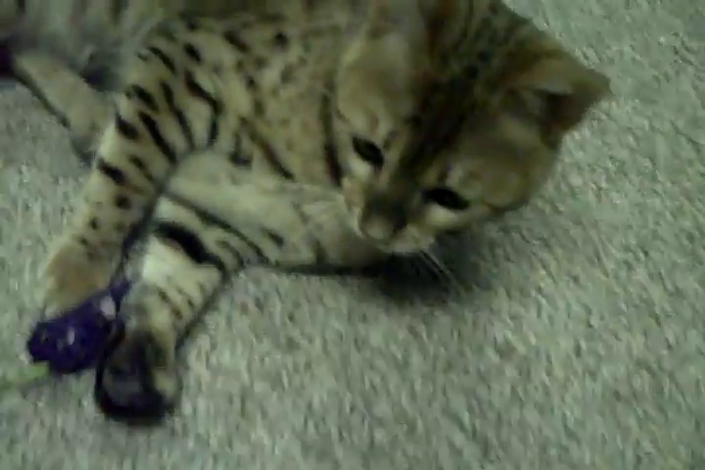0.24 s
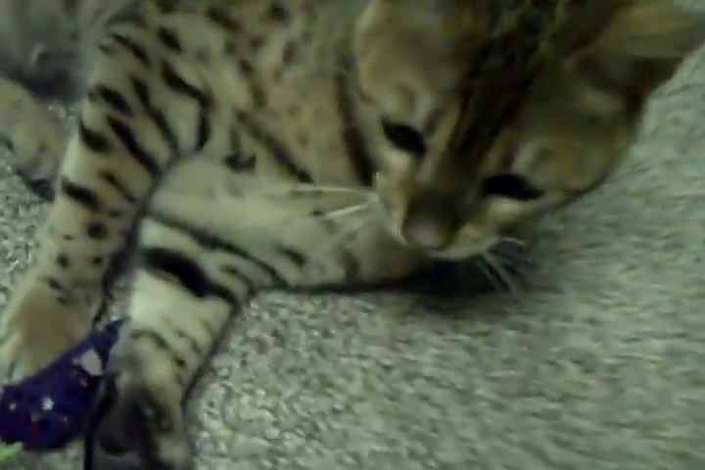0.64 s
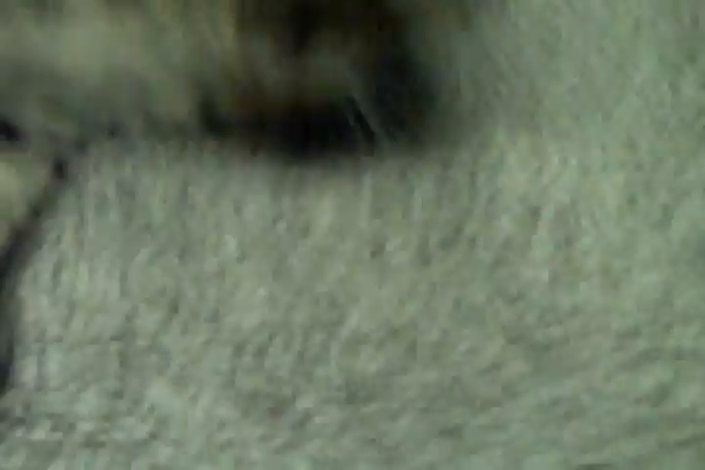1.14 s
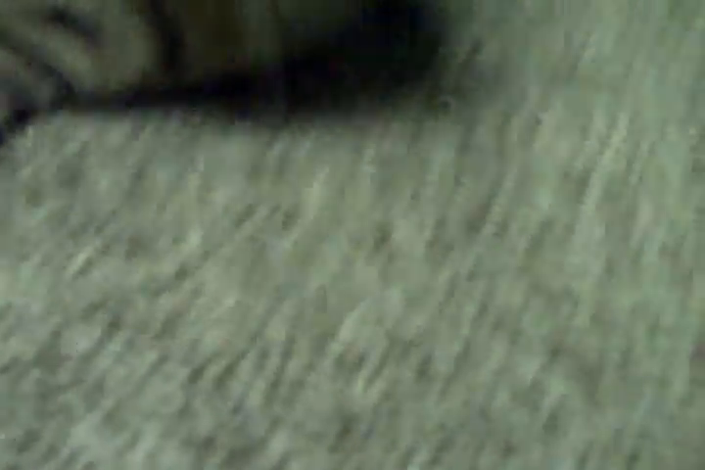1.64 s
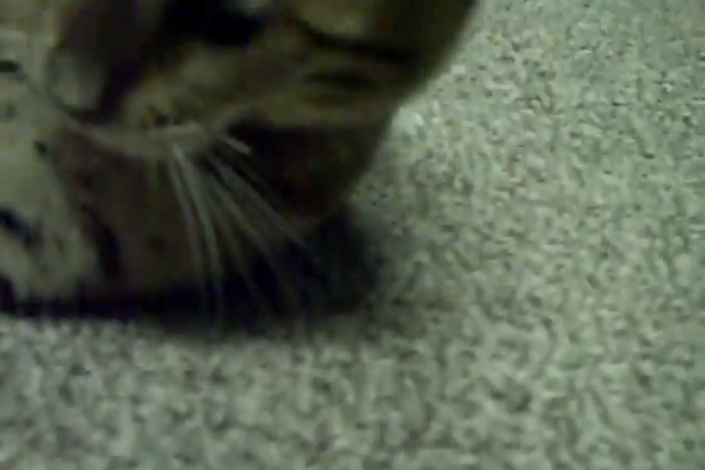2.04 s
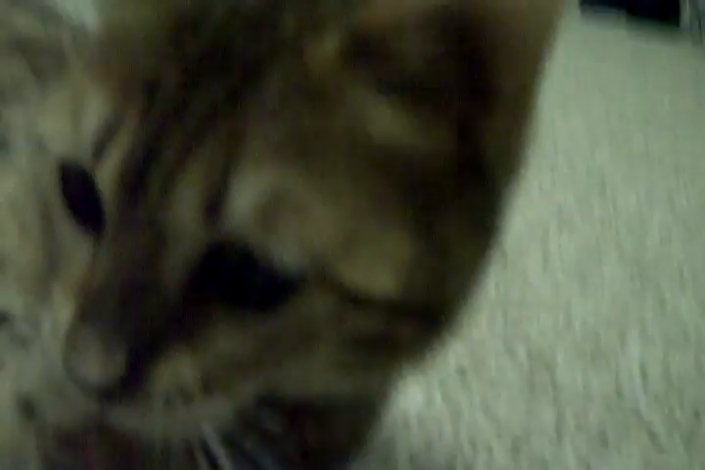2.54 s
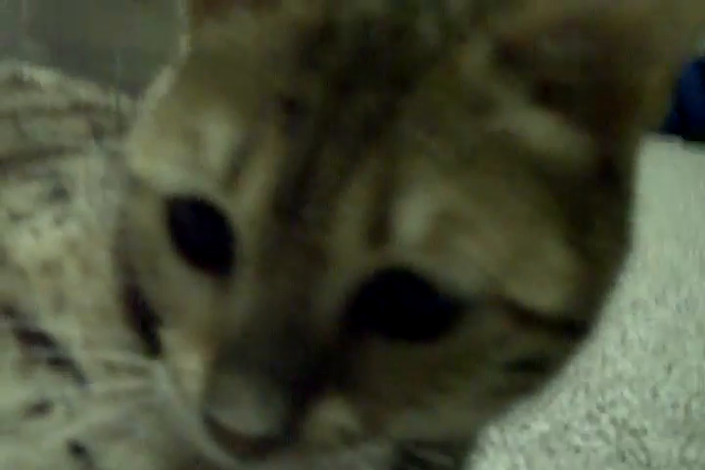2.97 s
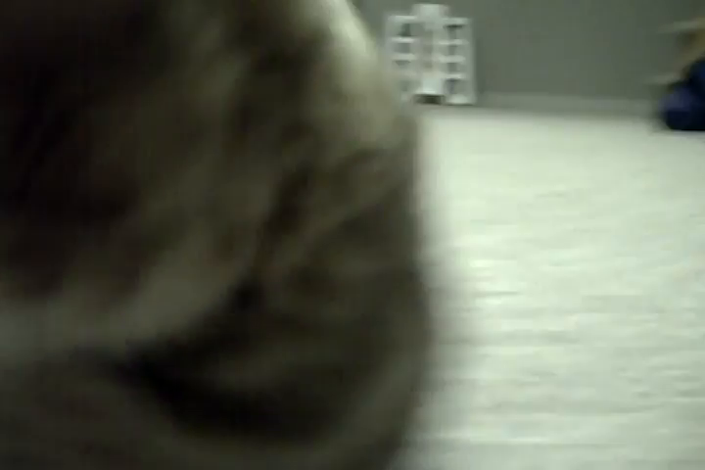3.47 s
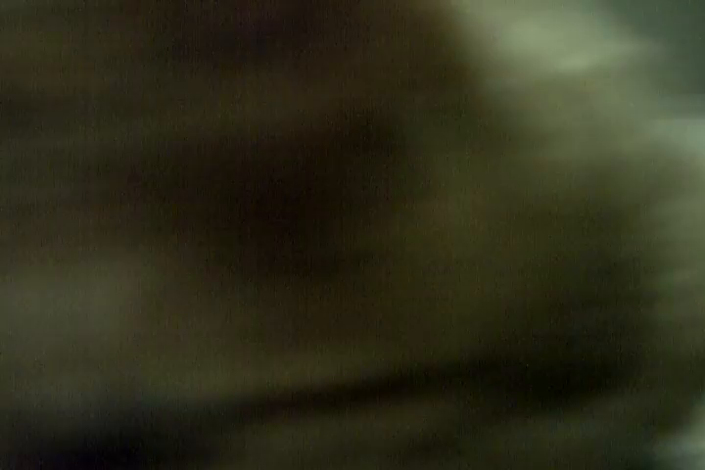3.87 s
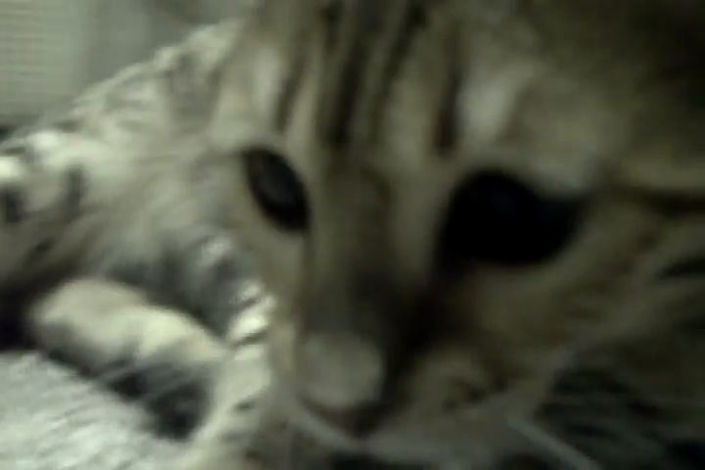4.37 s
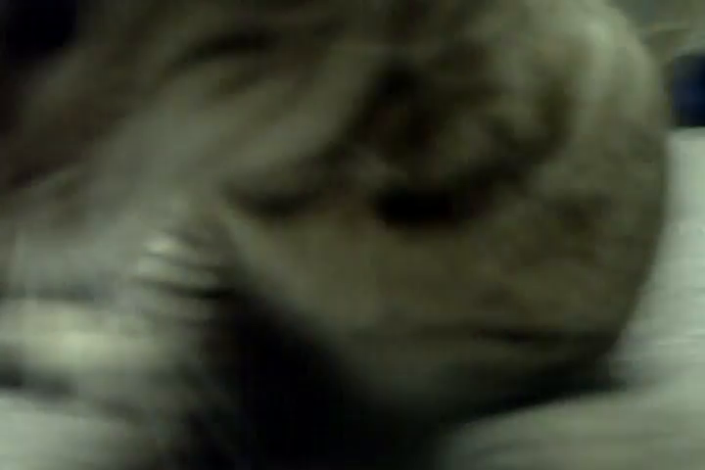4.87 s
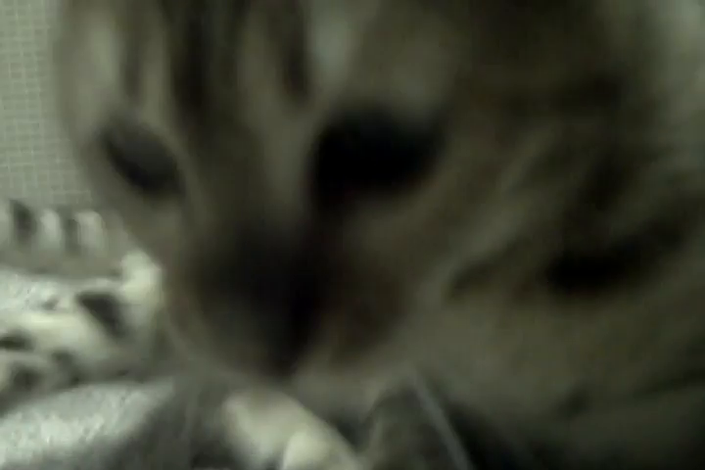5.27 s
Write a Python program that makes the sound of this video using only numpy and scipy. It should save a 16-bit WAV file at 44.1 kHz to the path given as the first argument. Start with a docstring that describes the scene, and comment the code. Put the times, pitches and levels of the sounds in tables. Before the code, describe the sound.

Close plastic clicks, paw knocks and brushing fur as a cat nudges the microphone in a quiet room with a low hum.

```python
"""On a carpet in a quiet room, a cat pushes its head and paws against a small hand-held camera.
Right at the microphone, a loose plastic part drags, snaps and bounces, claws and pads knock on
the hollow case and fur brushes over it, with a few low thumps and pops. The hardest snaps clip.
Behind this lie the soft slide of the coat, room noise, a low hum and a thin electronic whine."""
import sys
import numpy as np
from scipy import signal
from scipy.fft import rfft, irfft, next_fast_len
from scipy.io import wavfile
from scipy.ndimage import uniform_filter1d

SR = 44100
rng = np.random.default_rng(int(sys.argv[2]) if len(sys.argv) > 2 else 0)


def bounce(signal):
    """Save signal as a 16-bit WAV file at the path given by the first command-line argument."""
    frames = np.transpose(np.atleast_2d(signal))
    limited = np.clip(frames, -1, 1)
    pcm = np.round(limited * 32767).astype(np.int16)
    wavfile.write(sys.argv[1], SR, pcm)


N = 242731
TIME = np.arange(N) / SR
HIT_TIME = TIME[:SR // 5]


# Each row: snap time in seconds, level in dB, bounce delay in seconds, drag length in seconds,
# drag level in dB. A delay or length of 0 means no bounce or no drag.
PART_SNAPS = [(1.0294, -9, .0031, .006, -36), (1.0921, -4, .0061, .014, -38),
              (1.2135, -2.5, .0048, .044, -39), (1.2466, -4.3, .0057, .010, -34), (1.4182, -27.5, 0, 0, 0),
              (1.4430, -35, 0, 0, 0), (2.3365, -10.5, .0036, .022, -44), (2.3649, -3.5, 0, .008, -34)]

def snaps(bounce_db=-8.7, grip_share=.55, release_s=.014):
    """Pushed by the cat, the loose part scrapes along, snaps against its stop and bounces once."""
    out, scrape = np.zeros(N), friction()
    for s, db, bounce_s, drag_s, drag_db in PART_SNAPS:
        add(out, s, undb(db) * part_hit())
        if bounce_s > 0:
            add(out, s + bounce_s, undb(db + bounce_db) * part_hit())
        if drag_s > 0:
            gripped_s = s - drag_s * (1 - grip_share)
            grip = np.interp(TIME, [s - drag_s, gripped_s, s, s + release_s], [.15, 1, 1, 0], left=0)
            out += undb(drag_db) * scrape * grip
    return out


# Modes of the loose part. Each row: frequency in Hz, level in dB, t60 in seconds.
LOOSE_PART_MODES = [(750, -22, .014), (1350, -19, .010), (2000, -12, .016), (2280, -12, .016),
                    (2980, -6, .014), (3350, -7, .011), (3950, -5, .013), (4150, -10, .011),
                    (5420, -7, .009), (5950, -7, .009), (6750, -3, .010), (7350, 0, .010), (7750, -5, .009),
                    (8500, -8, .007), (10300, -11, .005), (3413, -42, .13), (4113, -52, .14),
                    (7154, -50, .1)]

def part_hit(burst_s=.0007):
    """The loose part hits its stop, sheds most of its energy at once and rings briefly."""
    envelope = .62 + .99 * np.exp(-HIT_TIME / burst_s)
    body = ring(LOOSE_PART_MODES, rise_s=.00022, detune=.0021) * envelope
    return body + undb(-16) * tick(decay_s=.0019, tail_db=-31, tail_s=.006)


# Each row: landing time in seconds, then levels in dB of pad thud, hollow ring,
# claw at first touch and claw on landing.
PAW_KNOCKS = [(1.2183, -25, -28, -28.5, -42), (1.3330, -25.5, -25.5, -47, -39),
              (2.0055, -24, -37, -54, -44), (2.1128, -15, -29, -29, -45), (2.3280, -33, -34, -52, -50),
              (2.3410, -33, -33, -52, -44), (5.0520, -19, -21.5, -10, -5)]

def knocks(claw_lead_s=.0044, touch_db=-10):
    """Each paw blow is two contacts: the claw touches, then the pad lands and sounds the hollow case."""
    out = np.zeros(N)
    for s, thud_db, hollow_db, touch_claw_db, claw_db in PAW_KNOCKS:
        add(out, s - claw_lead_s, case_hit(thud_db + touch_db, touch_claw_db, hollow_db=-np.inf))
        add(out, s, case_hit(thud_db, claw_db, hollow_db))
    return out


# Each row: start in seconds, thud level in dB, claw level in dB.
CASE_TAPS = [(1.0093, -14.5, -34.5), (1.0152, -19, -27.5), (1.3439, -35, -39.5), (1.5560, -39, -54),
             (1.6359, -31, -54), (2.0085, -28, -45), (2.0522, -41, -51), (2.0753, -41, -49),
             (2.3570, -24, -35), (2.8565, -35, -47), (4.8699, -29.5, -22.5), (5.1506, -39.5, -45.5),
             (5.2331, -38, -59), (5.2750, -28.5, -45.5)]

def taps():
    """Single light contacts with the case; the hollow ring follows the weight of each."""
    out = np.zeros(N)
    for s, thud_db, claw_db in CASE_TAPS:
        add(out, s, case_hit(thud_db, claw_db, hollow_db=thud_db - 17))
    return out


# Modes of the case shell and of the air inside. Each row: frequency in Hz, level in dB, t60 in seconds.
SHELL_MODES = [(290, -10, 0.012), (717, -3, 0.006), (1015, 2, 0.0095), (1267, -4.5, 0.011),
               (1728, -1, 0.008), (2400, -7, 0.013), (2900, -11, .006), (3625, -6.5, 0.011),
               (5415, -6, 0.0069), (6740, -8.5, .006), (7270, -6, 0.0068), (8340, -1, .006),
               (8640, -2, 0.0038), (10170, -9.5, .005)]
CAVITY_MODES = [(359, -20, 0.076), (650.3, -6.5, 0.047), (690, -9, .028), (1314, -7, 0.017)]

def case_hit(thud_db, claw_db, hollow_db, split_hz=3200):
    """The soft pad drives the low modes of the case, the claw the high ones; the air inside rings on."""
    low = [mode for mode in SHELL_MODES if mode[0] < split_hz]
    high = [mode for mode in SHELL_MODES if mode[0] >= split_hz]
    thud = ring(low, rise_s=.0002, detune=.03)
    claw = ring(high, rise_s=.00041, detune=.0042)
    claw += undb(-1) * tick(decay_s=.0016, tail_db=-35.5, tail_s=.016)
    hollow = ring(CAVITY_MODES, rise_s=.0008, detune=.012)
    return undb(thud_db) * thud + undb(claw_db) * claw + undb(hollow_db) * hollow


# Spectrum of scratching on the case. Each row: frequency in Hz, gain in dB.
SCRATCH_SPECTRUM = [(200, -19.5), (650, -2), (1000, -6), (1300, 2), (1850, -7.5), (2400, -0.5), (3400, -1),
                    (4450, -14), (5600, -1.5), (7300, -4.5), (8600, -1), (9500, -12), (10500, -14),
                    (12000, -30.5)]

def tick(decay_s, tail_db, tail_s):
    """A claw or edge skids for an instant and the case chatters after it; peak near 1."""
    envelope = np.exp(-HIT_TIME / decay_s) + undb(tail_db) * np.exp(-HIT_TIME / tail_s)
    burst = colour(rng.standard_normal(len(HIT_TIME)) * envelope, SCRATCH_SPECTRUM)
    onset_rms = np.sqrt(np.mean(burst[:SR // 1000] ** 2))
    return .43 * burst / onset_rms


# Each row: start in seconds, frequency in Hz, peak level in dB.
LOW_THUMPS = [(1.212, 42, -41.5), (1.2139, 190.2, -31.5), (1.329, 80, -36.5), (2.316, 35.85, -39),
              (5.275, 268, -33)]

def thumps(t60_cycles=3.5):
    """Short low thumps and pops, each dying away within a few cycles."""
    out = np.zeros(N)
    for s, hz, db in LOW_THUMPS:
        add(out, s, undb(db) * ring([(hz, 0, t60_cycles / hz)], rise_s=.069 / hz, detune=.02))
    return out


# Each row: peak time, rise and fall in seconds, level in dB.
FUR_STROKES = [(1.66, .055, .075, -47), (2.68, .08, .06, -59.5), (2.914, .05, .04, -60),
               (4.24, .033, .076, -41), (4.396, .055, .058, -51.5), (4.534, .038, .036, -56),
               (4.712, .11, .08, -47), (4.824, .057, .046, -52), (5.045, .12, .012, -49.5),
               (5.427, .08, .12, -65)]

def fur(treble_hz=4400, treble_db_per_db=.35, neutral_db=-48.5):
    """Hairs catch and flick off the case as each stroke swells and fades; harder strokes are brighter."""
    hairs = friction()
    treble = signal.sosfiltfilt(signal.butter(2, treble_hz, "high", fs=SR, output="sos"), hairs)
    out = np.zeros(N)
    for s, rise_s, fall_s, db in FUR_STROKES:
        treble_db = treble_db_per_db * (db - neutral_db)
        out += undb(db) * swell(s, rise_s, fall_s) * (hairs + (undb(treble_db) - 1) * treble)
    return out


# Resonances of the rubbed case. Each row: centre in Hz, width in Hz, gain in dB.
RUB_RESONANCES = [(660, 150, -5), (1290, 230, -2), (2380, 160, -6), (3420, 300, -8), (6020, 250, -9),
                  (8550, 350, -2)]

def friction(catches_per_s=3500, scatter_db=1.5, patchy_db=1.3):
    """Thousands of tiny catches and slips keep the case ringing; rms near 1."""
    catches = rng.random(N) < catches_per_s / SR
    flicks = catches * rng.standard_normal(N) * undb(scatter_db * rng.standard_normal(N))
    rub = colour(unit(flicks) + undb(-3) * rng.standard_normal(N), SCRATCH_SPECTRUM)
    ringing = sum(undb(db) * signal.lfilter(*signal.iirpeak(hz, hz / width_hz, fs=SR), rub)
                  for hz, width_hz, db in RUB_RESONANCES)
    return unit(rub + ringing) * undb(patchy_db * drift(120))


# Each row: peak time, rise and fall in seconds, level in dB.
COAT_SLIDES = [(.9, .12, .3, -67), (1.5, .4, .33, -60.5), (2.03, .15, .13, -65), (2.70, .06, .06, -63),
               (4.19, .47, .3, -56.5), (4.75, .16, .16, -61)]
# Spectrum of the sliding coat. Each row: frequency in Hz, gain in dB.
COAT_SPECTRUM = [(150, -2.5), (400, 0), (1000, -0.5), (1600, -11), (2700, -8), (4500, -19), (8000, -13.5),
                 (11000, -31.5)]

def coat(rest_db=-72):
    """The soft, dull slide of the coat swells each time the cat shifts and never quite stops."""
    shifts = sum(undb(db) * swell(s, rise_s, fall_s, power=1.6) for s, rise_s, fall_s, db in COAT_SLIDES)
    level = np.hypot(undb(rest_db), shifts) * undb(1.1 * drift(25))
    return level * unit(colour(rng.standard_normal(N), COAT_SPECTRUM))


# Spectrum of the noise floor. Each row: frequency in Hz, gain in dB.
ROOM_SPECTRUM = [(20, 6), (40, -1.5), (80, -4.5), (170, -9.5), (330, -9), (480, -19), (900, -20),
                 (1500, -28.5), (2400, -28.5), (3800, -36.5), (8000, -33.5), (10200, -36), (11800, -53.5)]

def room(level_db=-54):
    """Low room noise and microphone hiss."""
    return undb(level_db + .6 * drift(6)) * unit(colour(rng.standard_normal(N), ROOM_SPECTRUM))


# Each row: frequency in Hz, rms level in dB.
HUM_TONES = [(120, -57.5), (257.3, -58.5), (110, -69), (329.5, -73)]

def hum():
    """Low steady tones, each wavering slightly in level."""
    out = np.zeros(N)
    for hz, db in HUM_TONES:
        amplitude = np.sqrt(2) * undb(db + .4 * drift(5.2))
        out += amplitude * np.sin(2 * np.pi * (hz * TIME + rng.random()))
    return out


def whine(tone_hz=7586, restart_hz=58.59, level_db=-69.5):
    """The camera's electronics sing in short bursts, each starting afresh: a narrow comb of lines."""
    cycle = TIME * restart_hz % 1
    gate = np.sin(np.pi * cycle) ** .25
    return undb(level_db) * unit(gate * np.sin(2 * np.pi * tone_hz * cycle / restart_hz))


def ring(modes, rise_s, detune):
    """Damped modes after one contact, peak 1; each contact strains the plastic a little differently."""
    out = 0
    for (hz, db, t60_s), strain in zip(modes, rng.standard_normal(len(modes))):
        envelope = undb(db) * np.exp(-np.log(1000) * HIT_TIME / t60_s)
        out += envelope * np.sin(2 * np.pi * hz * (1 + detune * strain) * HIT_TIME)
    out *= 1 - np.exp(-HIT_TIME / rise_s)
    return out / np.max(np.abs(out))


def swell(s, rise_s, fall_s, power=1.2):
    """Pressure builds smoothly up to time s and lets go again."""
    ramp = np.interp(TIME, [s - rise_s, s, s + fall_s], [0, 1, 0])
    return np.sin(np.pi / 2 * ramp) ** power


def colour(x, spectrum):
    """Minimum-phase filter through the given (Hz, dB) points."""
    hz, db = np.transpose(spectrum)
    size = 2 * next_fast_len(len(x))
    bins_hz = np.maximum(np.fft.rfftfreq(size, 1 / SR), 1)
    gain = undb(np.interp(np.log(bins_hz), np.log(hz), db))
    cepstrum = irfft(np.log(gain))
    cepstrum[1:size // 2] *= 2  # fold onto positive time
    cepstrum[size // 2 + 1:] = 0
    return irfft(rfft(x, size) * np.exp(rfft(cepstrum)))[:len(x)]


def drift(rate_hz):
    """Smooth random drift, rms 1."""
    hold = int(SR / rate_hz)
    steps = np.repeat(rng.standard_normal(N // hold + 1), hold)
    return unit(uniform_filter1d(steps, hold)[:N])


def undb(db):
    """Decibels to gain."""
    return 10 ** (np.asarray(db) / 20)


def unit(x):
    """Scale to rms 1."""
    return x / np.sqrt(np.mean(x ** 2))


def add(track, s, sound):
    """Mix a sound into the track at time s."""
    start = int(s * SR)
    track[start:start + len(sound)] += sound[:N - start]


def scene():
    """Everything reaches the one microphone directly."""
    return (snaps() + knocks() + taps() + thumps() + fur() + coat() + room() + hum() + whine())[None]


def record(dry):
    """The small microphone loses the top octave and overloads on the hardest snaps."""
    mic_top_hz, ceiling, output_top_hz = 11700, .72, 16500
    heard = signal.sosfilt(signal.ellip(8, .3, 60, mic_top_hz, fs=SR, output="sos"), dry)
    clipped = np.clip(heard, -ceiling, ceiling)
    return signal.sosfilt(signal.ellip(8, .2, 70, output_top_hz, fs=SR, output="sos"), clipped)


dry = scene()
out = record(dry)
bounce(out)
```